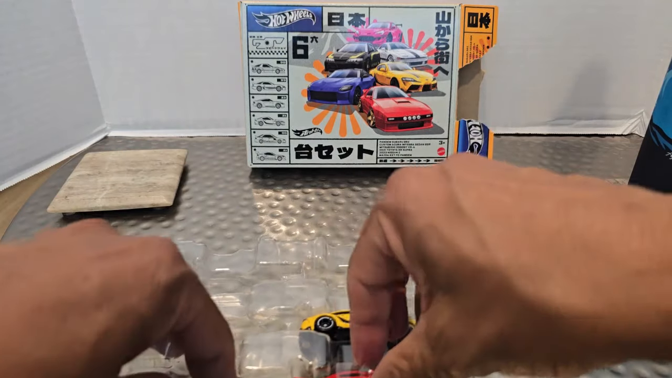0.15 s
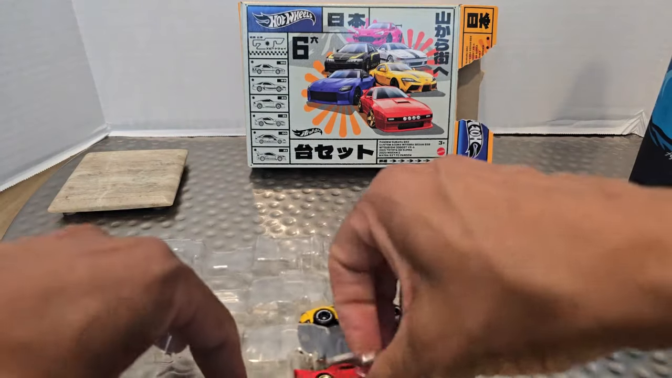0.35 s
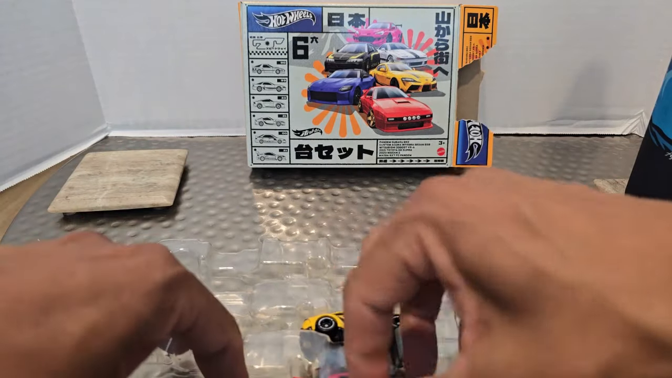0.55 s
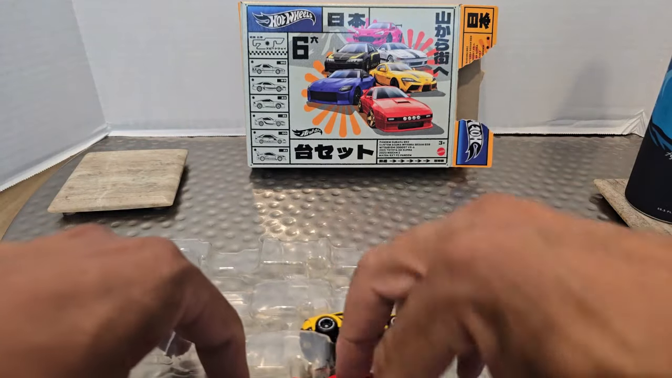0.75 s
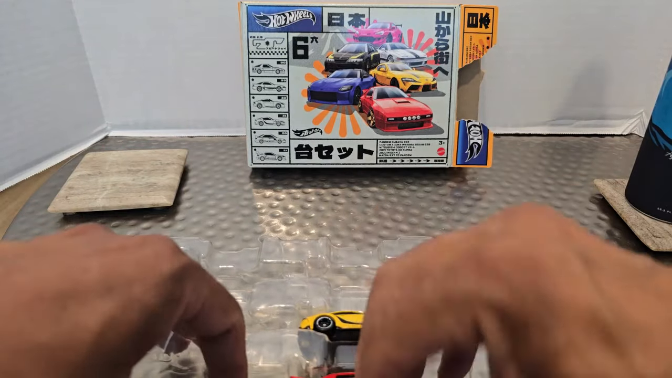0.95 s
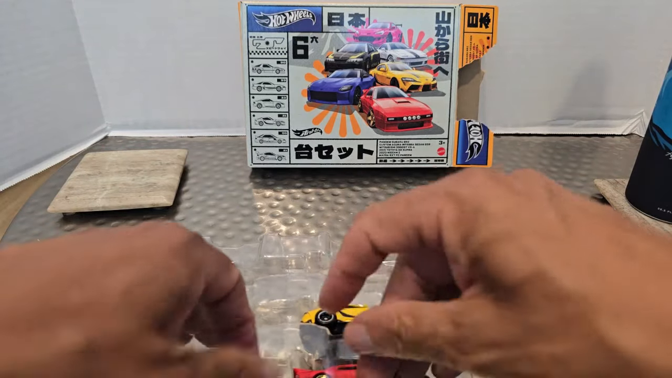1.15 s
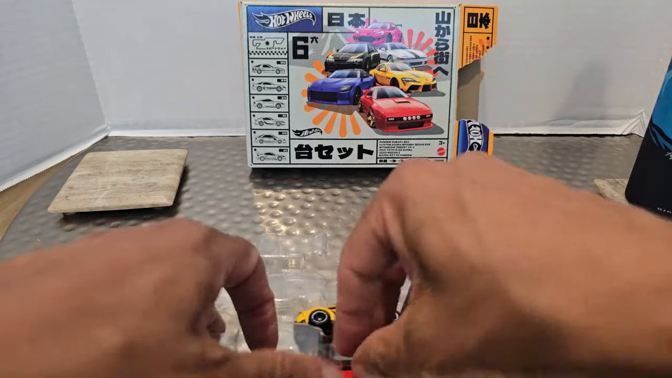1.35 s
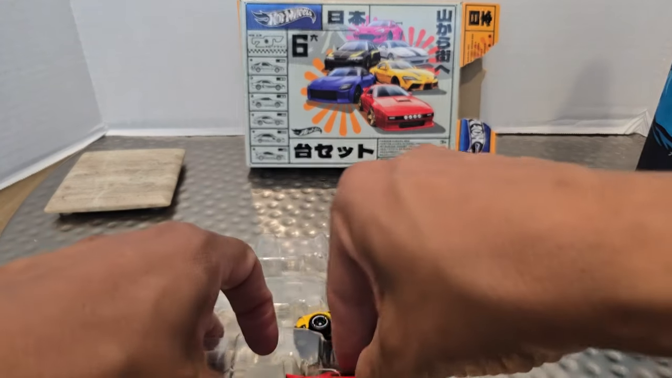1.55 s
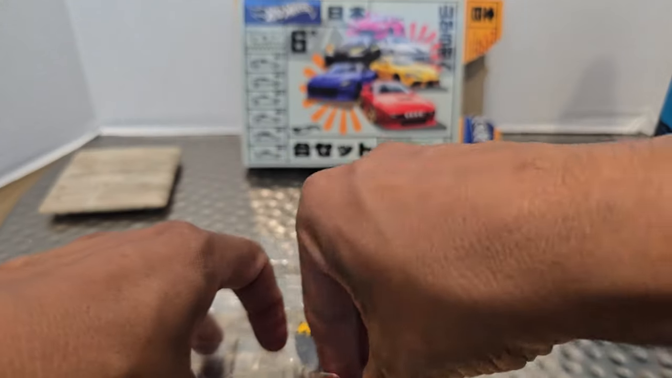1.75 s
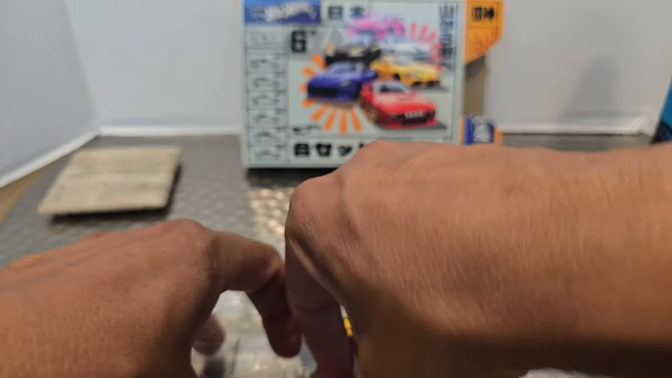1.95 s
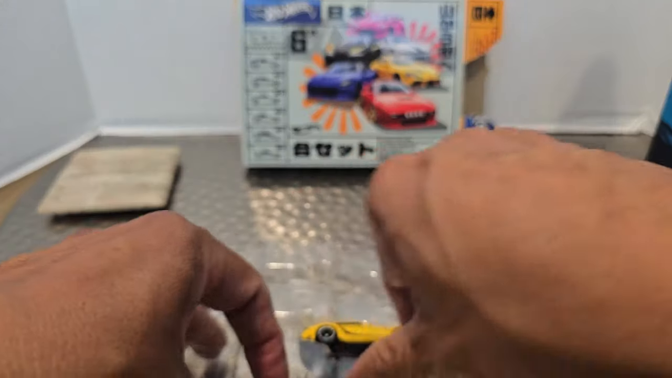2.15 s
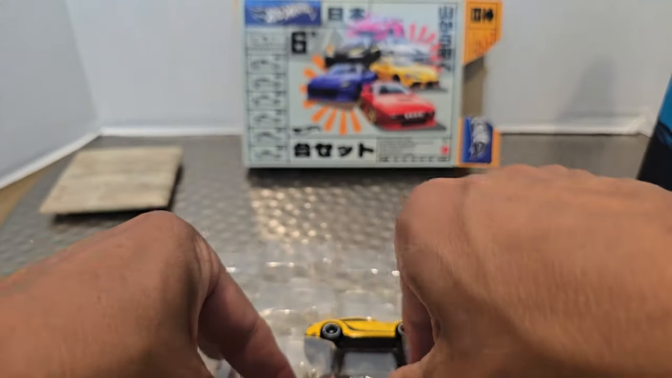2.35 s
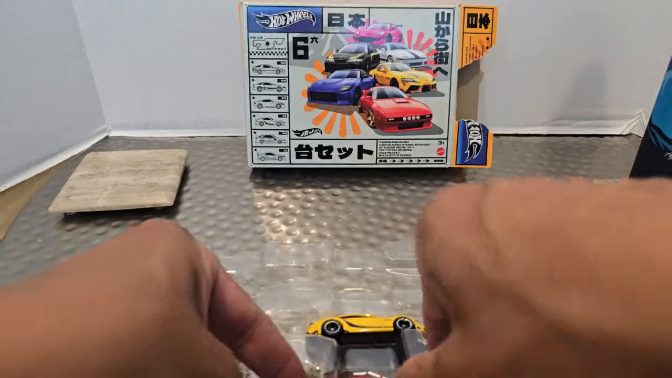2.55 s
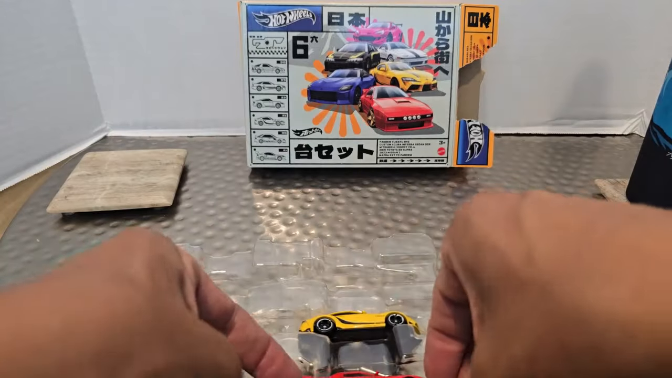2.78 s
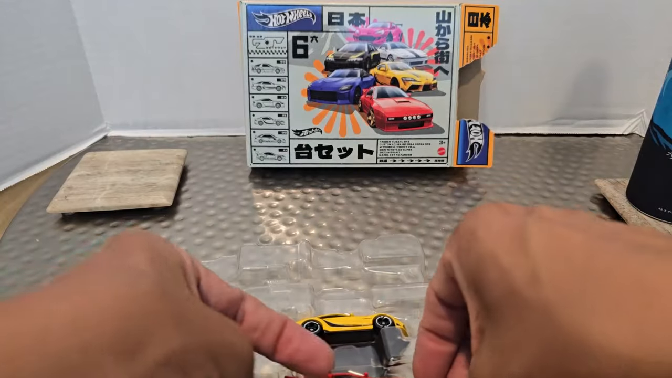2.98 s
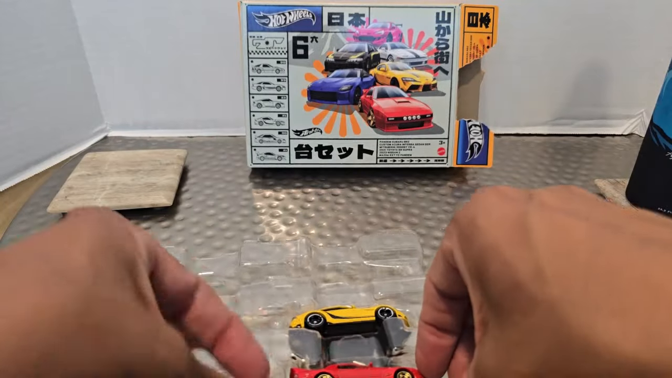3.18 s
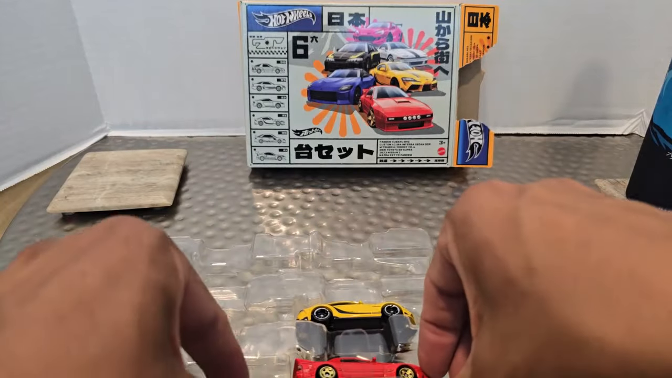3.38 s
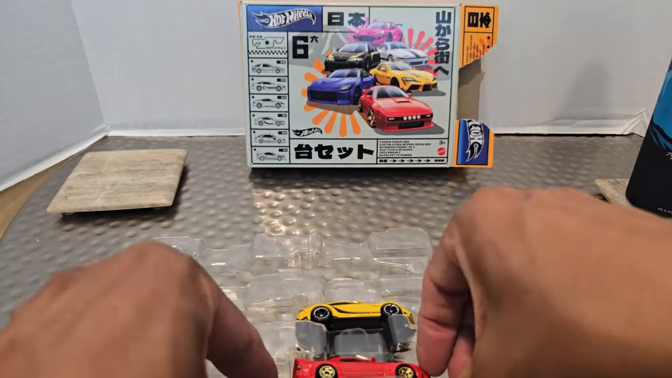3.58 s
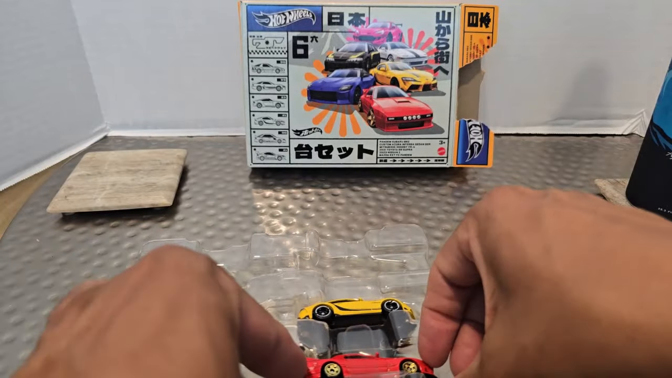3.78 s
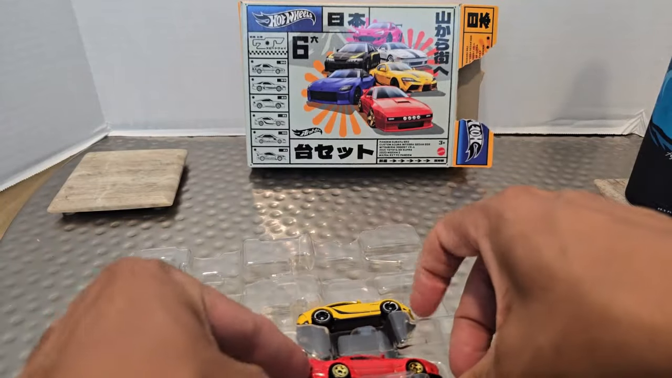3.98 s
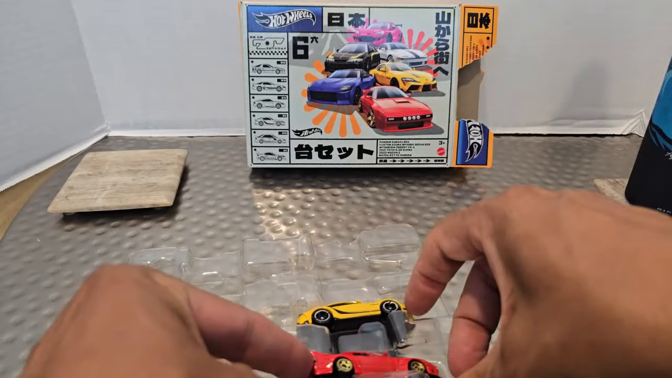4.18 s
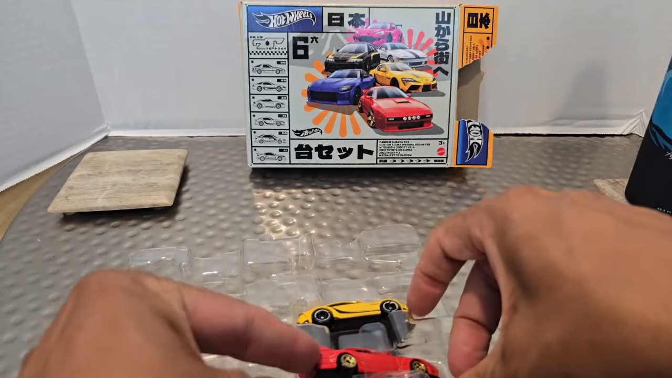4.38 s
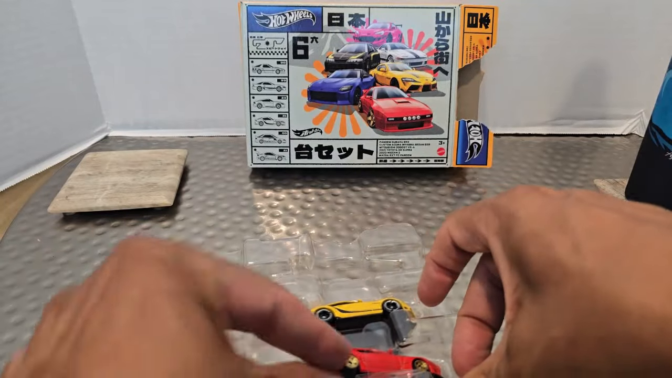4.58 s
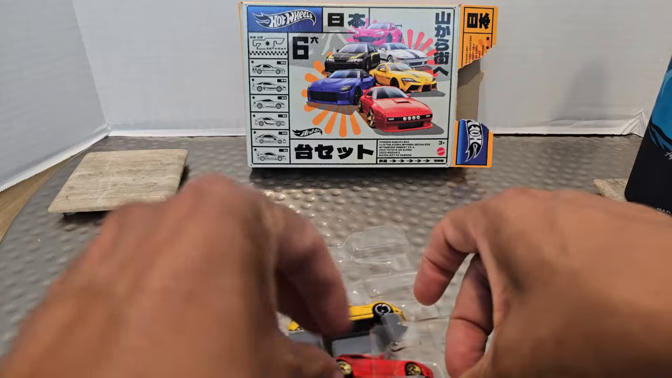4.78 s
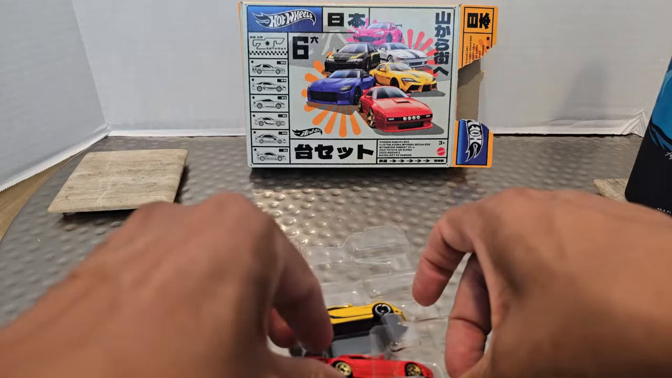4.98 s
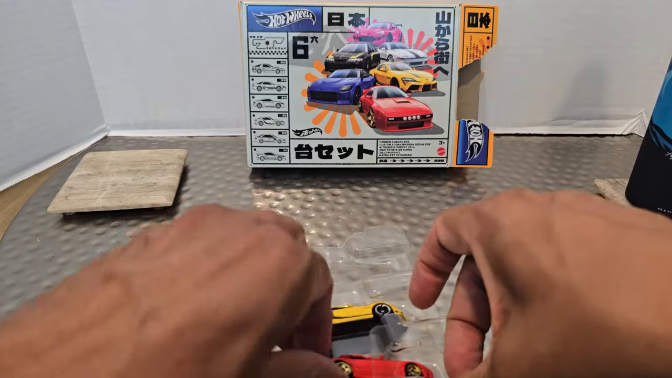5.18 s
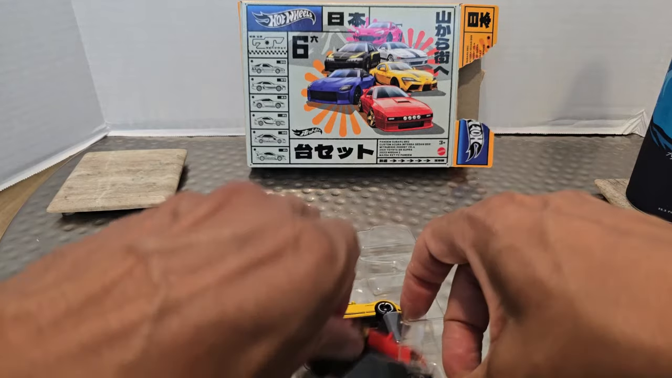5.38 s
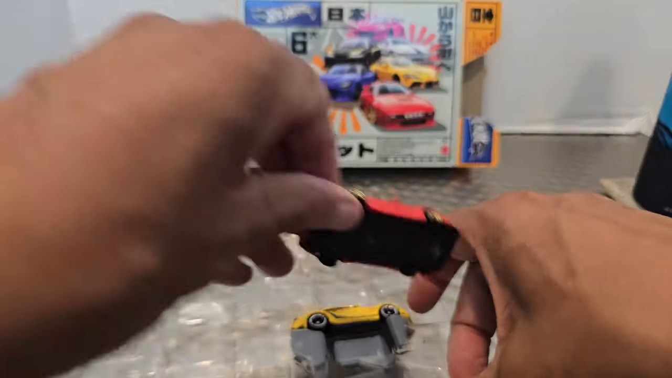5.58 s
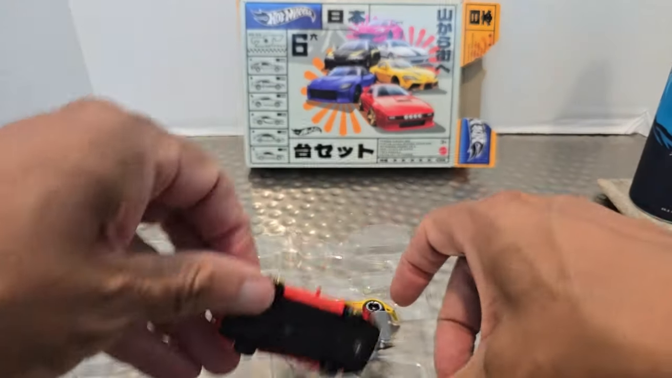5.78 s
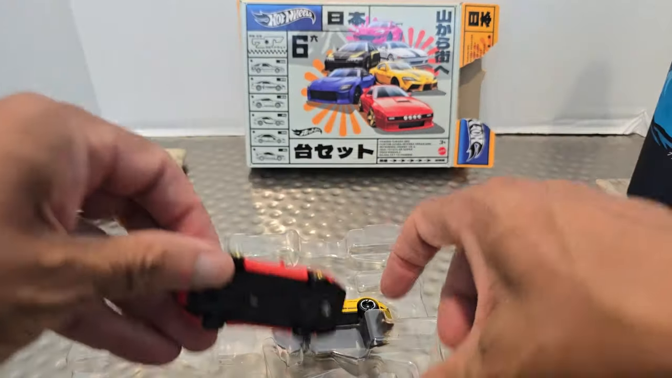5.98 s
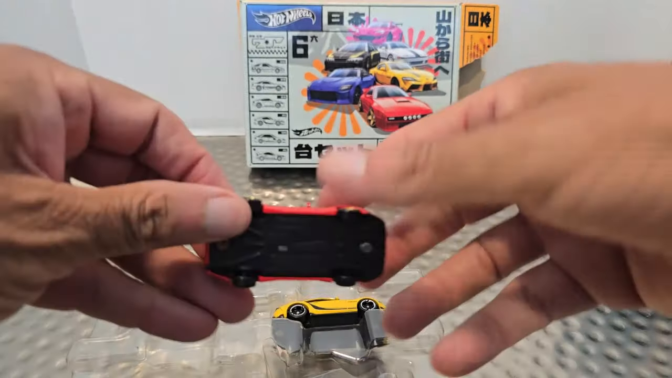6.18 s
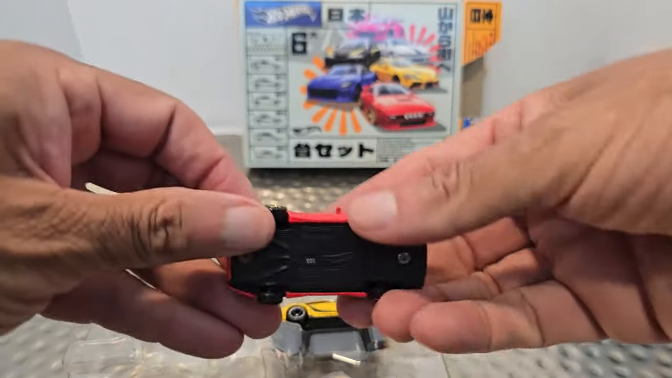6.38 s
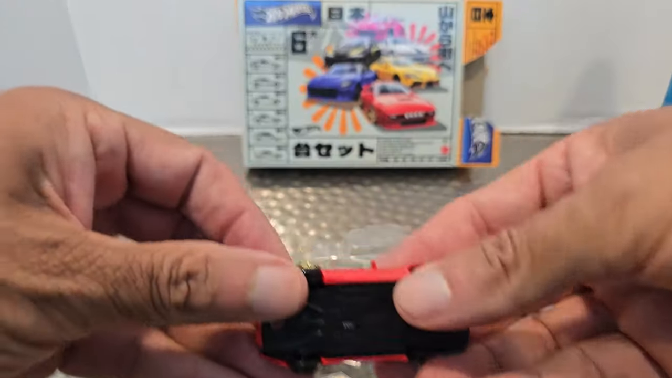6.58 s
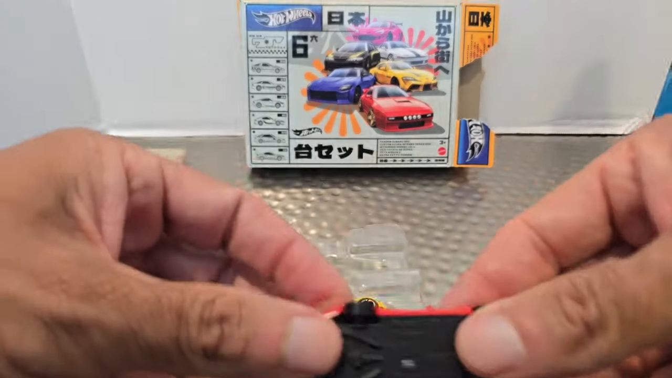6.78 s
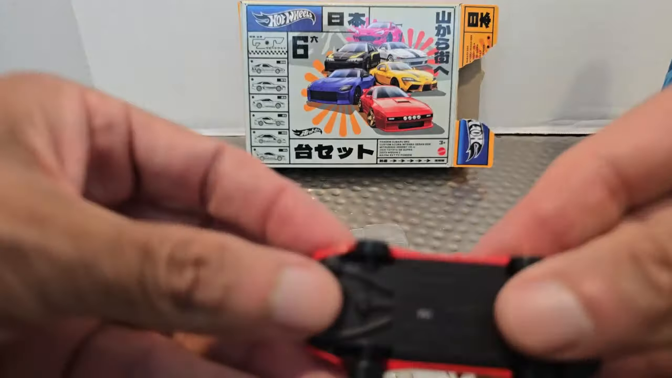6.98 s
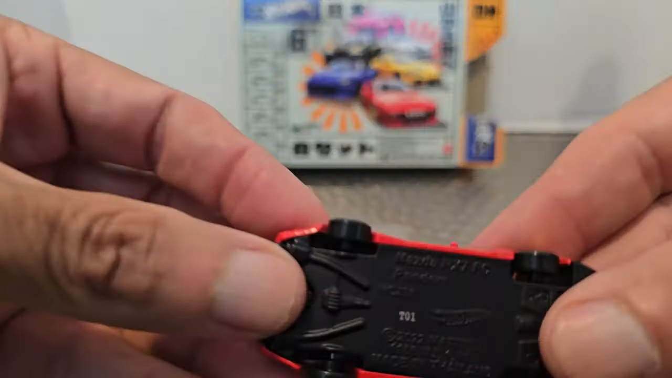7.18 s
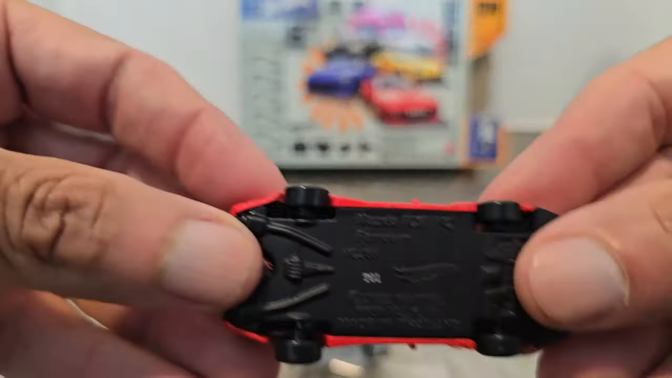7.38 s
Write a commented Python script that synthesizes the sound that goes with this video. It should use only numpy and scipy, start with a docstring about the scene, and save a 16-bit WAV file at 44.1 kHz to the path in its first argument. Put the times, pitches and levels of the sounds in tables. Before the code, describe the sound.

Thin plastic packaging creaks, crackles and knocks under busy fingers, then a toy car breaks free in a burst of sharp cracks and quiet follows.

```python
"""A small quiet room, a table, a stereo pair of microphones close by: fingers pry a toy car from its tray.
From the start hands rumble the table (low noise) and drag over the thin plastic (stick-slip noise), while
creases crackle, the tray snaps and soft knocks land (noise bursts through its resonances); the room answers.
Later the table thumps (short swinging tones). The metal car comes free in a burst of cracks and rings, then
is turned over quietly: skin slides on it (filtered friction noise) and its loose parts tick."""
import sys
import numpy as np
from scipy import signal
from scipy.fft import rfft, irfft
from scipy.io import wavfile
from scipy.ndimage import uniform_filter1d

SR = 44100
rng = np.random.default_rng(int(sys.argv[2]) if len(sys.argv) > 2 else 0)


def int16_out(signal):
    """Quantize to a 16-bit WAV file."""
    q = np.round(np.clip(np.atleast_2d(signal).T, -1, 1) * 32767)
    wavfile.write(sys.argv[1], SR, q.astype(np.int16))


N = 328104

# broad colour of the thin plastic tray: (frequency [Hz], relative level [dB])
TRAY_COLOUR = [(60, -14.5), (150, 4), (300, -5), (410, -11), (520, -4.5), (620, 2), (700, -6.5), (930, -4),
               (1080, 2), (1350, -10.5), (1600, -9.5), (2350, -15), (2900, -19.5), (3700, -19.5),
               (7000, -29), (11000, -28.5), (16000, -34.5)]
# resonances of the tray: (frequency [Hz], width [Hz], height over the broad colour before scaling [dB])
TRAY_MODES = [(259.6, 16, 10.5), (342, 85, 9.5), (503, 42, 8.5), (578, 120, 6), (688, 52, 12.5),
              (784, 20, 8.5), (984, 19, 9.5), (1180, 36, 2), (1487, 12, 3), (1553, 11, 6.5), (1674, 14, 8),
              (1750, 22, 1), (1900, 27, 6), (2239, 120, 2.5), (2150, 22, -1.5), (2520, 9.4, 5.5)]
# the tray's registers, ring, thud, clack, crack and tick: (T60 at length factor 1 [s], trim [dB],
# lingering share [dB], left-right likeness [0-1], left over right [dB])
REGISTERS = [(0.075, -7.5, -8.5, 0.93, 2.5), (0.12, -9.5, -4.5, 0.93, -0.5), (0.093, -8, -8.5, 0.15, 1.5),
             (0.081, -3, -10, 0.4, 2.5), (0.12, -4.5, -14, 0.3, 0)]
# range of each register, in the same order: (low edge [Hz], high edge [Hz])
REGISTER_EDGES = [(450, 1300), (90, 450), (1300, 2900), (2900, 7000), (7000, 17000)]
# how far the struck pocket and the buckling facet stand out: (width [Hz], height [dB])
POCKET, FACET = (100, 9.4), (330, 11)
LIFT_OFF_S = 6.03  # the hands start to leave the table and the tray


def amp(db):
    """Decibels to gain."""
    return 10 ** (np.asarray(db) / 20)


def unit(x):
    """Scales to rms 1."""
    return x / np.sqrt(np.mean(x ** 2) + 1e-20)


def add(mix, s, sound):
    """Mixes a stereo sound in at time s."""
    part = mix[:, max(round(s * SR), 0):][:, :sound.shape[1]]
    part += sound[:, :part.shape[1]]


def follow(s, db):
    """A level curve as a gain for every sample."""
    return amp(np.interp(np.arange(N) / SR, s, db))


def response(points, modes=(), size=8192):
    """Causal (minimum-phase) impulse response of a broad spectrum with resonance peaks on it."""
    hz = abs(np.fft.fftfreq(size, 1 / SR))
    f, level = np.transpose(points)
    db = np.interp(np.log(hz + 1), np.log(f + 1), level)
    for centre, width, height in modes:
        db = db + height / (1 + (2 * (hz - centre) / width) ** 2)
    log_gain = signal.hilbert(np.log(amp(db))).conj()
    return np.fft.ifft(np.exp(log_gain)).real[:size // 2]


def colour(x, taps):
    """Passes a stereo sound through an impulse response."""
    return signal.oaconvolve(x, taps[None], axes=1)[:, :x.shape[1]]


def band(x, edges):
    """Keeps one range of frequencies, with third-order slopes."""
    lo, hi = np.tan(np.pi * np.array(edges) / SR)
    w = np.tan(np.pi * np.fft.rfftfreq(len(x))) + 1e-9
    s = 1j * (w ** 2 - lo * hi) / (w * (hi - lo))
    return irfft(rfft(x) / ((s + 1) * (s ** 2 + s + 1)))


def pair(size, likeness, left_db):
    """Partly alike noise for the two microphones."""
    a, b = rng.standard_normal((2, size))
    c = np.clip(likeness, 0, 1)
    mid = np.sqrt((1 + c) / 2) * a
    side = np.sqrt((1 - c) / 2) * b
    return np.array([(mid + side) * amp(left_db / 2), (mid - side) * amp(-left_db / 2)])


def slips(per_s, spread_db, smooth, size=40):
    """Envelope of stick-slip friction: tiny jerks of uneven size over a smooth drag."""
    sizes = amp(spread_db * np.minimum(rng.exponential(1, N), 3.5))
    jerks = (rng.random(N) < per_s / SR) * sizes
    rounded = unit(signal.lfilter(np.hanning(size), [1], jerks))
    return unit(np.sqrt(rounded ** 2 + smooth ** 2))


def wander(x, depth_db, size=256, order=(4, 22)):
    """The colour of a rub drifts as the contact point moves."""
    z = signal.stft(x, nperseg=size)[2]
    patches = rng.standard_normal(z.shape[1:])
    for axis, span in enumerate(order):  # smoothed over frequency, then over time
        patches = uniform_filter1d(uniform_filter1d(patches, span, axis), span, axis)
    drifting = z * amp(depth_db * unit(patches))
    return unit(signal.istft(drifting, nperseg=size)[1][:, :N])


def steady(x, size=3500):
    """Evens out the slow swells of a low noise, so that the hands set its level."""
    return x / np.sqrt(abs(uniform_filter1d((x ** 2).mean(0), size)) + 1e-20)


def moves(rows, attack_s, release_s):
    """Gain of a series of hand movements (start, length, dB): each sets in, holds and dies away."""
    t = np.arange(0, N / SR + .002, .001)
    power = 0
    for start, length, db in rows:
        rise = np.clip((t - start) / attack_s + .5, 0, 1)
        fall = np.exp(-np.maximum(t - start - length, 0) / release_s)
        power = power + (amp(db) * rise * fall) ** 2
    return np.interp(np.arange(N) / SR, t, np.sqrt(power))


def room_tone(level_db=-68.5):
    """The quiet room: steady noise, mostly low, only partly alike in the two microphones."""
    # spectrum of the room: (frequency [Hz], relative level [dB])
    tone = [(20, -11.5), (55, -5.5), (90, -9), (140, -3), (250, -8.5), (340, -9.5), (480, -25.5),
            (700, -28.5), (1500, -33.5), (5000, -39.5), (16000, -42)]
    return amp(level_db) * unit(colour(pair(N, 0.28, 0.25), response(tone)))


def leaning(attack_s=0.025, release_s=0.02, rest_db=-63):
    """How hard the hands press on the table, as a gain for every sample."""
    # a hand leans on the table: (start [s], length [s], weight [dB])
    leans = [(0.0, 0.18, -40), (0.39, 0.11, -47.5), (0.9, 0.14, -58.5), (1.16, 0.3, -58.5),
             (1.52, 0.14, -54), (1.83, 0.32, -53), (2.06, 0.25, -49), (2.28, 0.14, -48), (2.5, 0.24, -51),
             (2.64, 0.26, -53), (2.94, 0.18, -50.5), (3.13, 0.081, -55), (3.3, 0.11, -44), (3.47, 0.1, -58),
             (3.81, 0.098, -53.5), (3.89, 0.21, -58.5), (4.1, 0.55, -77), (4.66, 0.17, -50),
             (4.98, 0.046, -51), (5.17, 0.29, -55.5), (5.39, 0.13, -42), (5.52, .2, -62), (5.8, 0.31, -66)]
    return moves([*leans, (0, LIFT_OFF_S, rest_db)], attack_s, release_s)


def table_rumble(lean, level_db=1):
    """The table shakes under pressing hands: low noise through the table top, as strong as they lean."""
    # spectrum of the table: (frequency [Hz], relative level [dB])
    spectrum = [(20, -16.5), (36, -23.5), (48, 1.5), (57, 2), (65, 5), (76, 4.5), (86, -14), (110, -6),
                (160, -37.5)]
    # lowest resonance of the table top: (frequency [Hz], width [Hz], height over the spectrum [dB])
    lowest_mode = [(56.3, 6.2, 14.5)]
    rumble = colour(pair(N, 0.94, 1.5), response(spectrum, lowest_mode))
    return steady(rumble) * amp(level_db) * lean


def tray_rubs(lean, attack_s=0.003, release_s=0.013, rest_db=-60.5, rest_grit_db=-26):
    """Fingers push and drag on the tray: low flexing, a stick-slip creak and a fine treble crinkle."""
    # a finger drags over the tray: (start [s], length [s], force [dB], grit over the force [dB])
    rubs = [(0.0, 0.11, -31, -19.5), (0.14, 0.2, -38, -13.5), (0.485, 0.041, -32, -19),
            (0.56, 0.44, -51, -13), (0.85, 0.047, -43, -17), (1.02, 0.07, -43, -11.5),
            (1.15, 0.16, -40.5, -25), (1.33, 0.071, -35.5, -17), (1.56, 0.14, -52.5, -10.5),
            (1.7, 0.79, -47, -11), (1.985, 0.098, -49.5, -2.5), (2.06, 0.3, -40.5, -22),
            (2.53, 0.14, -39.5, -19.5), (2.655, 0.053, -36, -10), (2.76, 0.24, -46.5, -19),
            (2.95, 0.053, -29, -17), (3.04, 1, -50, -13.5), (3.3, 0.064, -45, -7), (3.35, 0.048, -36, -16),
            (3.49, 0.048, -42.5, -37), (3.75, 0.037, -36, -17), (3.82, 0.1, -46.5, -21),
            (3.92, 0.13, -43, -16), (4.07, 0.18, -49.5, -36), (4.4, 0.64, -51.5, -13),
            (4.65, 0.058, -40, -12), (4.69, 0.1, -35, -18), (4.96, 0.014, -35.5, -27),
            (5.14, 0.75, -51.5, -12.5), (5.28, 0.07, -36, -24.5), (5.35, 0.19, -32.5, -18.5),
            (5.53, 0.26, -57, -4), (5.8, 0.031, -42.5, -12.5), (5.925, 0.11, -40.5, -12)]
    s, length, force_db, grit_db = np.transpose([*rubs, (0, LIFT_OFF_S, rest_db, rest_grit_db)])
    force = moves(zip(s, length, force_db), attack_s, release_s)
    grit = moves(zip(s, length, force_db + grit_db), attack_s, release_s)
    tray = response(TRAY_COLOUR, TRAY_MODES)

    # leaning on the table also flexes the tray
    push_db, lean_push_db = -12, -5.5
    flex = np.hypot(amp(push_db) * force, amp(lean_push_db) * lean)
    push = steady(colour(pair(N, 0.95, 0.73), band(tray, [100, 450]))) * flex

    # the car's edges catch and let go
    catches = slips(220, 2.6, .5)
    jerks = pair(N, 0.78, 2.1) * catches
    creak = wander(colour(jerks, band(tray, [430, 2200])), depth_db=4.5, size=512, order=(2, 6))

    # fine creases give way, partly with those catches
    drag = pair(N, .3, .5) * unit(.25 * catches + slips(700, 2.2, 1))
    crinkle = wander(colour(drag, band(tray, [2150, 17000])), depth_db=3.0, size=512, order=(3, 10))

    creak_db, crinkle_db = -7, 0.14
    return push + amp(creak_db) * force * creak + amp(crinkle_db) * grit * crinkle


def echo(x, t60_s=0.39, level_db=-17.5, size=16000):
    """The small room returns a faint, dull tail: decaying noise, different in the two microphones."""
    # colour of the room's answer: (frequency [Hz], relative level [dB])
    echo_colour = [(100, -11), (400, 1.5), (900, 1.5), (1600, -1), (2100, -5.5), (2400, 1.5), (2900, -7.5),
                   (8000, -16), (16000, -25.5)]
    tail = colour(pair(size, .3, 0), response(echo_colour)) * amp(-60 * np.arange(size) / SR / t60_s)
    tail /= np.sqrt(np.mean(abs(rfft(tail)[:, :size // 16]) ** 2))  # mean gain 1 below about 2.8 kHz
    return amp(level_db) * signal.oaconvolve(x, tail, axes=1)[:, :N]


def lingering_tails(narrowing=0.38, build_up=1.4):
    """Steady noise on the tray's resonances, one per register, to draw the late tails of the blows from."""
    # late in a tail only the resonances are left, so they stand out more
    ringing = response(TRAY_COLOUR, np.array(TRAY_MODES) * [1, narrowing, build_up])
    tails = []
    for edges, (*_, likeness, left_db) in zip(REGISTER_EDGES, REGISTERS):
        tails.append(unit(colour(pair(N, likeness, left_db), band(ringing, edges))))
    return tails


def struck_spot(own_modes, modal=0.79, facet_db=5.0, count=10):
    """The tray's first response at one spot: its own resonances, the whole tray's, and small facets nearby."""
    where, strength = rng.random((2, count))
    hz = 2400 * (15000 / 2400) ** where
    facets = np.transpose([hz, hz / 12, facet_db * (4 * strength - 1.5)])
    whole_tray = np.array(TRAY_MODES) * [1, 1, modal]
    return response(TRAY_COLOUR, [*own_modes, *whole_tray, *facets], size=4096)


def blow(levels, spot, tails, contact_hz, length, direct_db, hold_s, size=8000, count=441):
    """An impulse, its rebound and a quick noisy chatter, then a weak tail on the tray's resonances."""
    linger_t60_s = 0.23
    # a buckle overshoots and springs back: typical delay, and level against the first impulse
    rebound_s, rebound_db = 0.0042, -6
    t, out = np.arange(size) / SR, np.zeros((2, size))
    soft = signal.butter(2, min(contact_hz, .4 * SR), fs=SR)  # a soft contact is dull
    spot = signal.lfilter(*soft, spot)
    # each spot lies at its own distance from the two microphones (delays in samples)
    arrival = rng.integers(0, 3, 2)
    rebound = round(rebound_s * SR * rng.uniform(.7, 1.3))
    start = rng.integers(N - size)
    dying = amp(-60 * t / linger_t60_s)
    for db, edges, tail, register in zip(levels, REGISTER_EDGES, tails, REGISTERS):
        t60, trim_db, linger_db, likeness, left_db = register
        decay = amp(-60 * np.maximum(t - hold_s, 0) / (t60 * max(length, .25)))
        force = pair(size, likeness, left_db) * decay
        impulse = amp(direct_db) * np.linalg.norm(force, axis=1)
        force[[0, 1], arrival] += impulse
        force[[0, 1], arrival + rebound] -= amp(rebound_db) * impulse
        first = colour(force, band(spot, edges))
        first /= first[:, :count].std()  # the first 10 ms set the level
        lingering = amp(linger_db) * dying * tail[:, start:start + size]
        out += amp(db + trim_db) * (first + lingering)
    return out


def crackles(spread_db=-6, bright_db=-15.5, thud_db=-18):
    """Creases give way in random small cracks, each from another pocket and facet, as rows like the snaps'."""
    # showers of small cracks: (start [s], length [s], rate [1/s], mean strength [dB])
    showers = [(0.0, 5.3, 15, -47), (5.41, 0.33, 36, -35)]
    rows = []
    for start, length, per_s, db in showers:
        for when, force, pocket, facet in rng.random((int(length * per_s), 4)):
            strength = db + spread_db * (2 * force - 1)
            pocket_hz, facet_hz = 550 * 2 ** pocket, 1400 * 2 ** facet
            rows.append((start + when * length, strength, bright_db, thud_db, pocket_hz, facet_hz))
    return rows


def snaps(tails, level_db=1.24, base_length=0.34):
    """Hard snaps and small cracks of the buckling sheet: bright blows, shorter the stronger they are."""
    # the tray buckles sharply: (time [s], strength [dB], brightness, treble over the strength [dB],
    # thud over the strength [dB], ring of the pocket [Hz], ring of the buckling facet [Hz])
    buckles = [(.026, -32, -7.5, -16, 643, 1950), (0.082, -29, -12.5, -1.5, 1140, 1350),
               (.132, -37, -6, -25, 625, 1600), (.189, -39.5, -7, -11, 620, 1600),
               (0.3598, -32, -6.5, -13, 1300, 1550), (.396, -26, -8, -11.5, 700, 1540),
               (0.481, -32, -14, -20, 684, 1820), (0.484, -25.5, -13.5, -11, 1140, 1820),
               (.817, -38.5, -16.5, -21, 1140, 1680), (1.122, -31, -6, -31, 650, 2480),
               (1.13, -37.5, -9, 0.5, 610, 2420), (1.343, -42, -1.5, -2, 614, 2590),
               (1.425, -33.5, -12.5, -10, 1230, 1840), (1.565, -32, -31, -7, 555, 1390),
               (1.632, -38.5, -27, -27, 606, 1950), (1.724, -39.5, -28, -14, 600, 1600),
               (1.836, -39.5, -11, -12, 640, 1580), (2.055, -20, -12, -19, 545, 1510),
               (2.11, -32.5, -7.5, -18, 550, 1410), (2.132, -32.5, -6, 2, 620, 1645),
               (2.158, -25, -20, -32, 630, 1570), (2.201, -32, -14.5, -22, 800, 1750),
               (2.286, -32, -18.5, -13, 540, 1500), (2.393, -30.5, -15.5, -4, 660, 1780),
               (2.647, -36.5, -5, -17, 644, 2140), (2.689, -36, -1.5, -16, 600, 1990),
               (2.953, -31.5, -15, -0.5, 668, 1420), (3.147, -25.5, -22, -9.5, 1150, 1430),
               (3.282, -31, -15.5, -23, 1210, 1430), (3.35, -17, -8.5, -28, 720, 3920),
               (3.553, -36.5, -14.5, -8, 970, 1820), (3.936, -38, -14, -18, 600, 1560),
               (4.377, -46.5, -2, -18, 580, 1400), (4.8171, -28, -12, -22, 1310, 1580),
               (4.957, -29.5, -21, -15.5, 1090, 1500), (5.097, -44.5, -12.5, -15.5, 1100, 1500),
               (5.114, -43, -3, -20, 630, 1640), (5.406, -14, -30.5, -12, 596, 1670),
               (5.414, -35, -4.5, 8, 600, 1620), (5.441, -32, -6, -9.5, 699, 1600),
               (5.451, -12, -22.5, -8.5, 696, 1810), (5.5037, -12, -22.5, -14.5, 570, 1710),
               (5.5381, -13.5, -14.5, -17.5, 612, 1810), (5.5455, -26.5, -8.5, -16, 620, 2300),
               (5.554, -20, -9, -22, 1064, 1610), (5.559, -13.5, -21, -18.5, 1064, 1750),
               (5.5809, -23, -10.5, -9.5, 1060, 1530), (5.601, -14.5, -15, -23.5, 637, 2255),
               (5.6189, -29, -15, -24.5, 1073, 1900), (5.649, -22, -8, -36, 732, 1980),
               (5.659, -20.5, -17, -21.5, 678, 2500), (5.671, -27, -8.5, -16.5, 620, 2100),
               (5.679, -16, -12, -31.5, 1020, 1740), (5.686, -19.5, -21.5, -32.5, 1030, 1730),
               (5.717, -26.5, -12, -16, 1070, 2275), (5.742, -28, -17.5, -18, 1080, 1780),
               (5.92, -26.5, -27, -36.5, 603, 2250), (5.951, -26, -23.5, -32, 629, 1650),
               (5.975, -26, -16, -33, 650, 1570), (5.996, -19, -18.5, -30.5, 670, 2275),
               (6.007, -21, -36, -32, 710, 1550)]
    # what all snaps share, for ring, clack, crack and tick: (level over the strength [dB], gain per dB of
    # brightness [dB], gain per dB over an ordinary snap [dB]); big buckles sound lower
    snap_shape = [(-3.5, 0.18, 0.13), (0.5, 0.2558, 0), (-1, 1.0, 0.1527), (0, 1.49, -0.1542)]
    ordinary_db, length_per_db = -29, -0.0133
    shape_db, tilt, growth = np.transpose(snap_shape)
    out = np.zeros((2, N))
    for s, db, bright_db, thud_db, pocket_hz, facet_hz in [*buckles, *crackles()]:
        over_db = db - ordinary_db
        ring, clack, crack, tick = db + shape_db + tilt * bright_db + growth * over_db
        levels = [ring, db + thud_db, clack, crack, tick]
        spot = struck_spot([(pocket_hz, *POCKET), (facet_hz, *FACET)])
        length = base_length + length_per_db * over_db
        sound = blow(levels, spot, tails, contact_hz=16600, length=length, direct_db=-8.0, hold_s=0.003)
        add(out, s, amp(level_db) * sound)
    return out


def knocks(tails, level_db=-6):
    """The car and fingertips bump the tray: a soft contact excites only ring, thud and clack, dully."""
    # soft bumps: (time [s], strength [dB], thud over it [dB], clack over it [dB], ring of the pocket [Hz])
    bumps = [(.068, -27, 5, -22, 1080), (.102, -26, -24, 0, 610), (.167, -35, -24, 11, 1060),
             (.226, -28.5, -2, -11, 600), (0.277, -30.5, -5, -2, 555), (.317, -30, -20, -13, 625),
             (0.453, -27, -24, -22, 1070), (.518, -24.5, -16, -12, 600), (.584, -30, -5, -5, 667),
             (.643, -34, -9, -23, 647), (.804, -33, -9, -20, 570), (.874, -34, -17, -20, 615),
             (1.032, -21, -8, -30, 600), (1.049, -36, -11, -25, 620), (1.07, -26, -14, -20, 635),
             (1.087, -31, -7, -20, 630), (1.222, -38, 3, -6, 620), (1.256, -33.5, 1, -4, 607),
             (1.324, -30, -25, -8, 577), (1.405, -38, -18, -5, 630), (1.509, -40.5, -2, -7, 600),
             (1.556, -28.5, -4, -16, 537), (1.575, -28.5, -8, -22, 556), (1.897, -27, -8, -12, 610),
             (1.922, -30.5, -15, -1.5, 714), (2.023, -30.5, -26, -1, 557), (2.085, -28, 3, -12, 675),
             (2.252, -24, -29, -8, 580), (2.471, -26, -32, -17, 540), (2.518, -28.5, -21, -1, 543),
             (2.566, -30, -7, -2, 590), (2.624, -29, -16, 3, 640), (2.7, -23, -21, -11, 612),
             (2.726, -35, -12, -7, 600), (2.808, -31.5, -22, -0.5, 610), (2.882, -27.5, -7, -4, 695),
             (2.9435, -19, -5.5, -16, 530), (2.999, -32, -23, 5.5, 1180), (3.058, -28.5, -30, -11, 550),
             (3.085, -28.5, -12, -3.5, 605), (3.107, -29, -23, -15, 580), (3.188, -28.5, -16, -25, 613),
             (3.361, -22, -22, -5, 703), (3.381, -22.5, -30, -2, 686), (3.498, -37, -14, -10, 585),
             (3.535, -26, -8.5, 0, 570), (3.633, -20, -19, -23, 562), (3.664, -29.5, -7, -1, 656),
             (3.754, -27.5, -8, -5.5, 545), (3.901, -26.5, -29, -6.5, 560), (3.993, -30, -14, -4.5, 610),
             (4.03, -33, 1, -3, 582), (4.064, -37.5, -3, -1.5, 586), (4.091, -35.5, 0, -11, 603),
             (4.121, -33, -3, 0, 575), (4.187, -35.5, -14, -4, 580), (4.238, -29.5, -2, -5, 617),
             (4.313, -39.5, 0, -6, 656), (4.339, -27.5, -5, -16, 620), (4.38, -24, -3.5, -15, 593),
             (4.465, -40.5, 10, 2, 434), (4.547, -36, -4, -4, 600), (4.635, -30, -1, -2, 587),
             (4.701, -21.5, -23, -2.5, 570), (4.725, -20, -21, -9, 1060), (4.759, -27, -10, -16, 574),
             (4.788, -44, -14, 12, 584), (5.159, -33.5, -2.5, -6, 577), (5.231, -25, -22, -4, 567),
             (5.278, -29, -6, -6, 580), (5.339, -27.5, -13, -1.5, 680), (5.366, -23.5, -21, -2, 647),
             (5.469, -21.5, -2, -8, 725), (5.526, -23.5, 2, -10, 1080), (5.631, -26, -12, 8.5, 1020),
             (5.8, -22.5, -10, -8, 633)]
    out = np.zeros((2, N))
    for s, db, thud_db, clack_db, pocket_hz in bumps:
        levels = [db, db + thud_db, db + clack_db]
        spot = struck_spot([(pocket_hz, *POCKET)])
        sound = blow(levels, spot, tails, contact_hz=770, length=0.9, direct_db=-2.0, hold_s=0.0011)
        add(out, s, amp(level_db) * sound)
    return out


def table_bumps(peak_cycles=0.82, size=8000):
    """Each jolt swings the table top for a few cycles, alike in both microphones."""
    # a hand or the tray jolts the table: (time [s], level [dB], pitch [Hz])
    jolts = [(1.536, -45, 75), (1.612, -40.5, 114), (2.355, -39, 68), (3.016, -40, 70), (3.155, -40, 248),
             (3.778, -34, 61.4), (4.468, -37, 160), (5.503, -29, 170), (6.503, -55.5, 45.8),
             (6.622, -56, 55)]
    out = np.zeros((2, N))
    for s, db, hz in jolts:
        cycles = hz * np.arange(size) / SR
        swell = cycles / peak_cycles
        envelope = (swell * np.exp(1 - swell)) ** 2
        add(out, s, amp(db) * np.tile(envelope * np.sin(2 * np.pi * cycles), (2, 1)))
    return out


def car_ring(t60_s=0.18, tail_t60_s=0.42, tail_db=-26.5, size=16000):
    """The metal body rings briefly and roughly, noise through its resonances, then fades in a thin tail."""
    # the freed car's body flicks past the tray's rim: (time [s], level [dB])
    flicks = [(5.649, -24.5), (5.678, -30), (5.802, -44.5), (5.995, -35)]
    # resonances of the body: (frequency [Hz], width [Hz], height [dB])
    body_modes = [(2265, 90, 13), (2210, 110, 3.5), (2346, 130, 18.5), (2680, 120, 3.5)]
    t, out = np.arange(size) / SR, np.zeros((2, N))
    body = band(response([(20, 0), (20000, 0)], body_modes), [1800, 2900])
    dying = amp(-60 * t / t60_s) + amp(tail_db - 60 * t / tail_t60_s)
    for s, db in flicks:
        add(out, s, amp(db) * dying * unit(colour(pair(size, 0.77, 1.9), body)))
    return out


def car_in_hand(click_t60_s=0.038, click_db=-6, skin_db=2, click_hold_s=0.0047, size=4000, count=441):
    """Fingertips slide over the freed car, whose ring changes with the grip, and its loose wheels tick."""
    # skin sliding on the car: (time [s], level before skin_db [dB])
    slide = [(6.3, -86), (6.43, -77), (6.47, -71.5), (6.6, -73), (6.75, -67.5), (6.89, -69.5), (6.97, -82),
             (7.06, -89.5), (7.095, -73), (7.16, -75), (7.23, -67), (7.321, -65.5), (7.385, -59.5),
             (7.44, -61.5)]
    # small clicks of the car in the fingers: (time [s], level before click_db [dB])
    clicks = [(6.332, -65.5), (6.37, -64), (6.449, -62.5), (6.7384, -42)]
    # spectra of the sliding skin and of the clicking car: (frequency [Hz], relative level [dB])
    skin = [(400, -15), (900, -15.5), (1600, -19), (2200, -14), (2700, -8.5), (3150, -8), (4300, -3.5),
            (7000, -10), (11000, -6.5), (14500, -8.5), (16000, -32.5)]
    car = [(400, -26), (1000, -28), (1750, -11), (2050, -6.5), (2440, -2), (3300, -5), (4520, 2.5),
           (5380, -11.5), (10400, -5), (15300, -14), (16000, -25)]
    # base plate and wheels, held loosely, then pinched at both ends: (frequency [Hz], width [Hz], height [dB])
    plate_loose = [(2510, 150, 7), (3200, 660, -7.5), (5040, 170, 4), (7660, 660, 2.5), (10500, 450, 5.5)]
    plate_pinched = [(2130, 160, 13), (2760, 180, 9), (3150, 260, -7), (4200, 930, 7), (6400, 300, 7),
                     (10280, 310, 3)]
    regrip_s = 7.03

    s, slide_db = np.transpose(slide)
    t = np.arange(N) / SR
    drag = pair(N, 0.51, -0.41) * slips(500, 1.8, 1.9)
    loose = unit(colour(drag, response(skin, plate_loose)))
    pinched = unit(colour(drag, response(skin, plate_pinched)))
    sliding = wander(np.where(t < regrip_s, loose, pinched), depth_db=2.0, size=512, order=(3, 12))
    out = sliding * follow(s, slide_db + skin_db) * (t > s[0])

    shape = amp(-60 * np.maximum(t[:size] - click_hold_s, 0) / click_t60_s)
    shape = shape + 0.041 * shape ** 0.16  # with a weak, slower tail
    for at, db in clicks:
        tick = colour(pair(size, 0.45, -0.17) * shape, response(car, plate_loose))
        add(out, at, tick * amp(db + click_db) / tick[:, :count].std())
    return out


def scene():
    """Table, tray and car over a quiet room; the hands and the tray are what the room answers."""
    room = room_tone()
    lean = leaning()
    tails = lingering_tails()
    handled = table_rumble(lean) + tray_rubs(lean) + snaps(tails) + knocks(tails)
    car = car_ring() + car_in_hand()
    return handled + echo(handled) + table_bumps() + car + room


def record(dry, turn_hz=3500, sharpness=1.7, cutoff_hz=15750):
    """The right microphone lags the left through the middle range (an all-pass); then the band limit."""
    _, poles = signal.iirpeak(turn_hz, sharpness, fs=SR)
    microphones = np.array([dry[0], signal.lfilter(poles[::-1], poles, dry[1])])
    lowpass = signal.firwin(201, cutoff_hz, window=("kaiser", 8), fs=SR)
    return signal.oaconvolve(microphones, lowpass[None], "same", axes=1)


dry = scene()
out = record(dry)
int16_out(out)
```